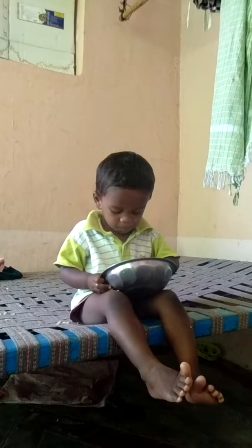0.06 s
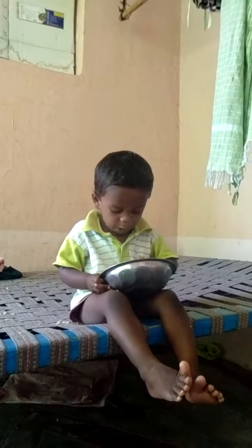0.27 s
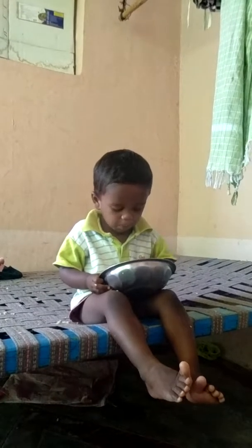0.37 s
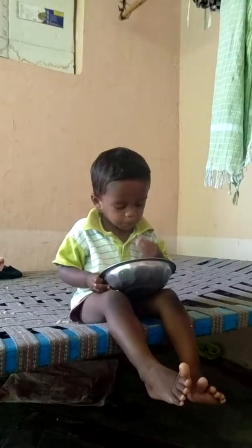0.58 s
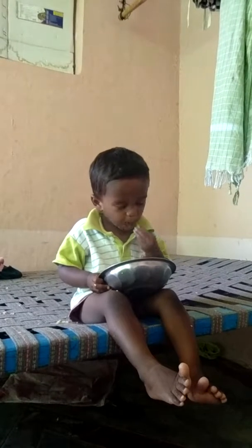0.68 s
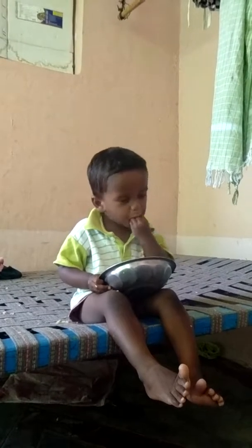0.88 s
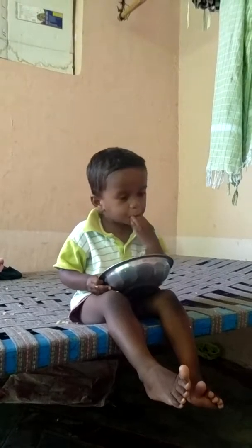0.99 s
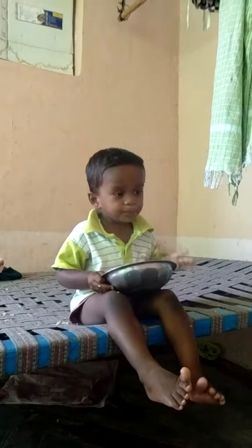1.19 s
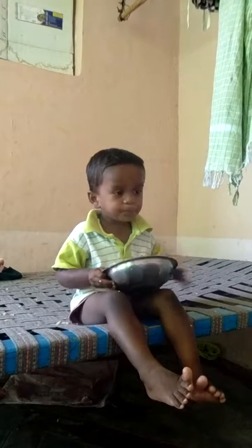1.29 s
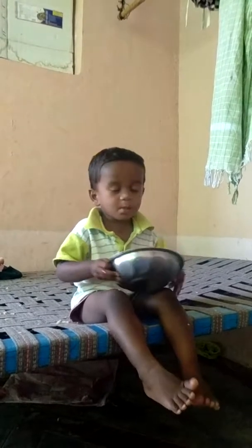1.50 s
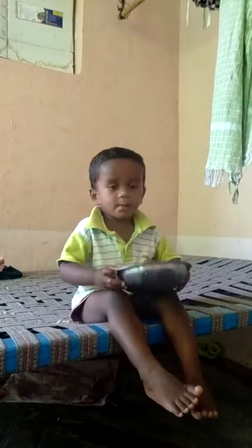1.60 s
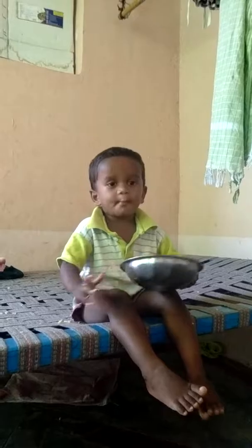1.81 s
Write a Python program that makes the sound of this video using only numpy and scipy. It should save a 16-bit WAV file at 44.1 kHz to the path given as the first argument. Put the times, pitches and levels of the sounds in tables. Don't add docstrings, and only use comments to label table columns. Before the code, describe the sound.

A thin steel bowl held on a lap is knocked five times, loud first, then softer and hand-damped, with tiny ticks, a sleeve brush and a low cot thud; small plastered room, close microphone, faint hum.

```python
import sys
import numpy as np
from scipy import signal
from scipy.fft import rfft, irfft, next_fast_len
from scipy.io import wavfile
from scipy.ndimage import uniform_filter1d

SR = 44100
rng = np.random.default_rng(int(sys.argv[2]) if len(sys.argv) > 2 else 0)


def convert_level_to_amplitude(level_db):
    exponent = np.asarray(level_db, float) / 20
    return 10 ** exponent


def materialize(psi):
    bounded = np.clip(np.atleast_2d(psi).T, -1, 1)
    quanta = np.round(bounded * 32767).astype(np.int16)
    wavfile.write(sys.argv[1], SR, quanta)


N = 81585

# start in seconds, clack level in dB, low tone level in dB, rim level in dB,
# time in seconds until the hand grips.
KNOCKS = [
    (0.2106, -0.5, -11, -20, 0.038),
    (0.6208, -5.5, -11.5, -25.5, 0.011),
    (0.9391, -4.5, -9.5, -27.5, 0.0068),
    (1.1798, -14.5, -17, -32, 0.018),
    (1.5583, -6, -11, -27.5, 0.0098),
]
# gain in dB at 1.6 kHz, at 2 kHz, at 3 kHz,
# above 5 kHz, and of the wash.
TILTS = [(4.5, -4, 5, 4.5, 9), (-2, -4, 2.5, 3, 1.5), (6, 5, -2.5, -1, -1), (-19, 2, 2.5, 0.7, -4),
         (-11, 3.5, -1.5, 0, 3.5)]
THUMP_DB = [-6, -0.5, -0.8, 8, 0.9]
# pitch in Hz, level
# in dB, t60 in seconds, sign.
TONE = [(736, 0.1, .4, 1), (743, -6, .25, 1), (712, -15, .26, -1), (1109, -17, .45, 1), (1097, -28, .3, -1)]
THUMP_BELOW_HZ, CONTACT_S = 500, 0.00028
LONGER_PER_FREE_S = 12
SCATTER_DB = 2.5


def at_hz(points, hz):
    table_hz, values = np.array(points).T
    return np.interp(np.log(hz), np.log(table_hz), values)


def add(out, s, sound):
    i = int(s * SR)
    out[i:i + len(sound)] += sound[:N - i]


def fade(t, t60):
    return convert_level_to_amplitude(-60 * t / max(t60, 0.003))


def drift(rate):
    knots = rng.standard_normal(200)
    return np.interp(np.arange(N) / SR * rate, np.arange(200), knots)


def bandpass(x, low, high):
    return signal.sosfilt(signal.butter(2, [low, high], "band", fs=SR, output="sos"), x)


def ring(db, hz, t60, rise=0.0001):
    t = np.arange(int(1.2 * t60 * SR) + 9) / SR
    onset = 1 - np.exp(-t / rise)
    return convert_level_to_amplitude(db) * onset * fade(t, t60) * np.sin(2 * np.pi * hz * t)


def narrow(hz, width_hz, size):
    settle = 2000
    x = bandpass(rng.standard_normal(size + settle), hz - width_hz / 2, hz + width_hz / 2)[settle:]
    return x / x.std()


def burst(db, hz, t60, share, rise=0.00076):
    t = np.arange(SR // 5) / SR
    return convert_level_to_amplitude(db) * np.minimum(t / rise, 1) * fade(t, t60) * narrow(hz, share * hz, size=len(t))


def bands(spectrum, shape):
    white = rng.standard_normal((2, N))
    edges = 28 * 2 ** np.arange(0, 9.4, 0.4)
    out, power = 0, 0
    for k, (low, high) in enumerate(zip(edges, edges[1:])):
        hz = np.sqrt(low * high)
        band = convert_level_to_amplitude(at_hz(spectrum, hz)) * bandpass(white[k % 2], low, high)
        out = out + band * shape(hz)
        power = power + np.mean(band ** 2)
    return out / np.sqrt(power)


def bowl_modes():
    # pitch in Hz, level in dB, t60 in seconds.
    rim = [(1452, -5, 0.055), (1617.6, -2, 0.15), (1720, 3.5, .1), (1738, -2.5, 0.077), (1856, -7, 0.12),
           (2072, -0.5, 0.08), (2195, 5, 0.055), (3696, -2.5, 0.13), (3870, -4.5, 0.16), (3944, 5, 0.066),
           (4060, -2.5, 0.11), (4377, -4.5, 0.053), (2740, -6.5, 0.077), (5040, -11, 0.048)]
    # pitch in Hz, level in dB, t60 in seconds.
    bottom = [(281, -9, 0.034), (389, -14, 0.03), (1037, 2, 0.014), (977, -18.5, 0.043), (1363, -2, 0.0064),
              (2408, -29, 0.08), (2430, -29, 0.051), (2979, -27, .11), (3164, -23.5, 0.051),
              (3540, -34, 0.13)]
    tilt_hz = [1200, 1640, 1710, 2200, 2800, 3350, 3600, 4500, 5000]
    rim_swell_s = 0.00067
    out = np.zeros(N)
    for (s, clack_db, _, rim_db, free), tilt, thump_db in zip(KNOCKS, TILTS, THUMP_DB):
        gains = [0, tilt[0], tilt[1], tilt[1], tilt[2], tilt[2], 0, 0, tilt[3]]
        colour = list(zip(tilt_hz, gains))
        longer = 1 + LONGER_PER_FREE_S * free
        for modes, level_db, stretch in ((rim, rim_db, longer), (bottom, clack_db, 1)):
            for hz, db, t60 in modes:
                deep = hz < THUMP_BELOW_HZ
                luck_db = SCATTER_DB * rng.standard_normal() * (hz > tilt_hz[0])
                db = db + level_db + at_hz(colour, hz) + luck_db + thump_db * deep
                swell = rim_swell_s if hz > tilt_hz[1] else CONTACT_S
                sign = 1 if deep else -1
                add(out, s, sign * ring(db, hz, t60 * stretch, swell))
    return out


def low_tones():
    swell_s, grip_t60_s = 0.0049, 0.1
    out = np.zeros(N)
    for s, clack_db, tone_db, rim_db, free in KNOCKS:
        longer = 1 + LONGER_PER_FREE_S * free
        for k, (hz, db, t60, sign) in enumerate(TONE):
            sound = sign * ring(db + tone_db, hz, t60 * longer, swell_s)
            if k == 0:
                t = np.arange(len(sound)) / SR
                sound = sound * fade(np.maximum(t - free, 0), grip_t60_s)
            add(out, s, sound)
    return out


def shimmer_and_crack():
    # pitch in Hz, level in dB, t60 in seconds.
    shimmer = [(5020, -54.5, 0.042), (5710, -70, 0.043), (7300, -42.5, 0.078), (8490, -48.5, 0.082),
               (9570, -48.5, 0.064), (10940, -47.5, 0.095), (12400, -53, 0.037)]
    crack_db, crack_s = -31, 0.0059
    out = np.zeros(N)
    t = np.arange(SR // 2) / SR
    for knock, tilt in zip(KNOCKS, TILTS):
        for hz, db, t60 in shimmer:
            db = db + tilt[3] + SCATTER_DB * rng.standard_normal()
            add(out, knock[0], burst(db, hz, t60, share=0.071, rise=CONTACT_S))
        grit = bandpass(rng.standard_normal(len(t)), 3000, 9000)
        add(out, knock[0], convert_level_to_amplitude(tilt[3] + crack_db) * np.exp(-t / crack_s) * grit)
    return out


def wash():
    # frequency in Hz, level in dB per Hz.
    spectrum = [(60, 8), (250, -6), (560, -3), (1000, -7.5), (2500, -4), (4300, -15.5), (5500, -38),
                (15000, -42)]
    # frequency in Hz, t60 in seconds.
    decay = [(100, 0.37), (700, 0.23), (2000, 0.23), (5000, 0.17), (13000, 0.1)]
    wash_db = -26.5
    t = np.arange(SR // 2) / SR

    def dying(hz):
        shape = np.zeros(N)
        tail = fade(t, at_hz(decay, hz)) * (1 - np.exp(-t / CONTACT_S))
        for knock, tilt, thump_db in zip(KNOCKS, TILTS, THUMP_DB):
            gain_db = min(thump_db, 0) if hz < THUMP_BELOW_HZ else tilt[4]
            add(shape, knock[0], convert_level_to_amplitude(wash_db + gain_db) * tail)
        return shape * convert_level_to_amplitude(3.2 * drift(80))

    return bands(spectrum, dying)


def earlier_ring():
    out = np.zeros(N)
    hz, _, t60, _ = TONE[3]
    add(out, 0, ring(-49.5, hz, t60))
    return out


def touches_and_ticks():
    # start in seconds, level in dB, pitch in Hz, t60 in seconds.
    touches = [
        (1.032, -43, 4060, .06),
        (1.193, -25.5, 4090, .06),
        (1.572, -29.5, 4014, 0.14),
        (1.652, -56, 4140, 0.037),
        (1.181, -22, 3176, 0.033),
        (1.181, -24.5, 2164, 0.035),
        (1.59, -34, 3940, 0.053),
    ]
    # start in seconds, level in dB, pitch in Hz, t60 in seconds.
    ticks = [
        (.387, -64, 9400, 0.018),
        (.437, -64, 10100, 0.0092),
        (.715, -67, 9000, 0.14),
        (1.05, -59, 9400, 0.036),
        (1.064, -64, 9450, 0.045),
        (1.03, -65, 9600, 0.045),
        (1.287, -56, 9360, 0.034),
        (1.303, -54, 6050, 0.013),
        (1.571, -34.5, 9100, 0.038),
        (1.64, -66, 9000, 0.11),
    ]
    out = np.zeros(N)
    for table, share in ((ticks, 0.27), (touches, 0.039)):
        for s, db, hz, t60 in table:
            add(out, s, burst(db, hz, t60, share))
    return out


def sleeve():
    # frequency in Hz, level in dB per Hz.
    spectrum = [(1500, -9), (3000, 2), (6000, -2.5), (10000, -10.5), (13000, -26)]
    start_s, rise_s, hold_s, t60_s, level_db = 1.309, 0.0042, 0.035, 0.15, -53.5
    t = np.maximum(np.arange(N) / SR - start_s, 0)
    stroke = np.minimum(t / rise_s, 1) * fade(np.maximum(t - hold_s, 0), t60_s)
    stroke = stroke * convert_level_to_amplitude(level_db + 2.1 * drift(90))
    return bands(spectrum, lambda hz: stroke * (hz > 1200))


def cot():
    # start in seconds, level in dB, pitch in Hz, t60 in seconds.
    thuds = [
        (1.742, -38, 65, .1),
        (1.803, -28, 97, .08),
        (1.828, -38, 85, .04),
    ]
    out = np.zeros(N)
    for s, db, hz, t60 in thuds:
        add(out, s, -ring(db, hz, t60, rise=0.004))
    return out


def room(x):
    # frequency in Hz, t60 in seconds.
    decay = [(100, 0.52), (700, 0.33), (2000, 0.23), (5000, 0.22), (13000, 0.15)]
    size = next_fast_len(N + SR)
    hz = np.maximum(np.fft.rfftfreq(size, 1 / SR), 1)
    turn, wet = -2j * np.pi * hz, 0
    for k, lag in enumerate(rng.uniform(0.004, 0.027, 12)):
        loop = convert_level_to_amplitude(-60 * lag / at_hz(decay, hz)) * np.exp(turn * lag)
        wet = wet + (-1) ** k * loop / (1 - loop)
    for lag in (0.0011, 0.0029, 0.0047):
        delay = np.exp(turn * lag)
        wet = wet * (delay - 0.6) / (1 - 0.61 * delay)
    return irfft(rfft(x, size) * wet, size)[:N] / np.sqrt(12)


def distant_hum():
    # frequency in Hz, level in dB per Hz.
    spectrum = [(30, -26), (65, -8.5), (280, -3), (520, -18.5), (1050, -14), (2000, -25.5), (4000, -35),
                (6000, -61.5)]
    # pitch in Hz, width in Hz, level in dB.
    drones = [(663.4, 210, -54.5), (1010, 100, -63.5), (2000, 66, -68)]
    together = drift(2.82)
    hum = convert_level_to_amplitude(-46.5) * bands(spectrum, lambda hz: convert_level_to_amplitude(1.93 * together + 0.63 * drift(19)))
    for hz, width_hz, db in drones:
        hum = hum + convert_level_to_amplitude(db + 2.8 * drift(6.13)) * narrow(hz, width_hz, size=N)
    return hum


def scene():
    room_db, tone_room_db = -11.5, -27
    tone = low_tones()
    near = bowl_modes() + shimmer_and_crack() + wash() + earlier_ring()
    near = near + touches_and_ticks() + sleeve() + cot()
    reverb = convert_level_to_amplitude(room_db) * room(near + convert_level_to_amplitude(tone_room_db) * tone)
    return (near + tone + reverb + distant_hum())[None]


def roll_off(x):
    return signal.sosfilt(signal.butter(12, 16500, fs=SR, output="sos"), x)


def record(dry):
    ceiling_db, release_db_per_s, hiss_db = -4, 305, -76
    ahead = 20
    ramp = release_db_per_s * np.arange(N) / SR
    over = np.maximum(20 * np.log10(np.abs(dry[0]) + 1e-9) - ceiling_db, 0)
    early = np.append(over[ahead:], np.zeros(ahead))
    held = np.maximum.accumulate(early + ramp) - ramp
    x = dry + convert_level_to_amplitude(hiss_db) * rng.standard_normal(N)
    x = x * convert_level_to_amplitude(-uniform_filter1d(held, size=21))
    x = signal.sosfilt(signal.cheby2(12, 60, 16400, fs=SR, output="sos"), x)
    x = signal.sosfilt(signal.butter(2, 63, "high", fs=SR, output="sos"), x)
    return roll_off(x)


dry = scene()
out = record(dry)
materialize(out)
```